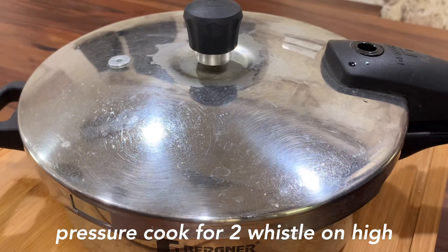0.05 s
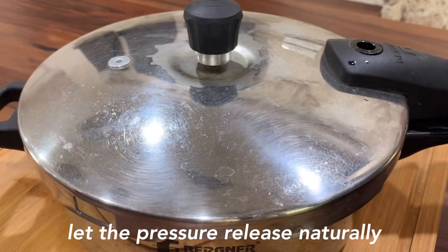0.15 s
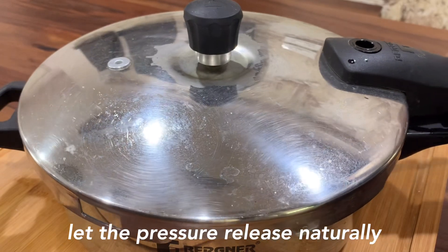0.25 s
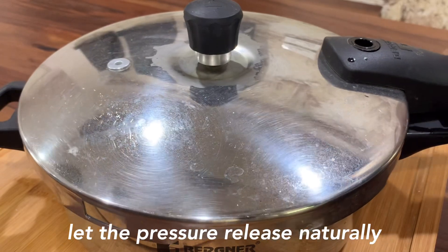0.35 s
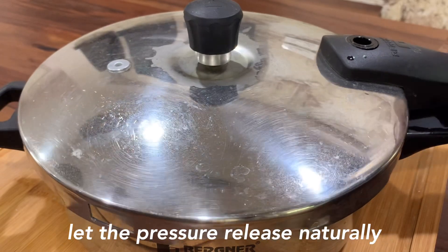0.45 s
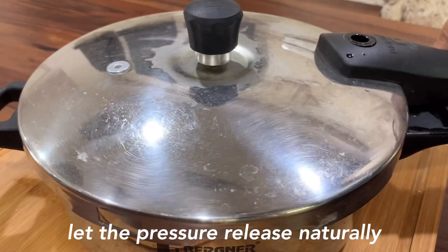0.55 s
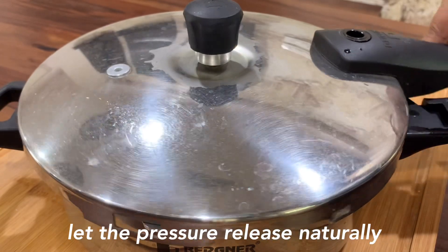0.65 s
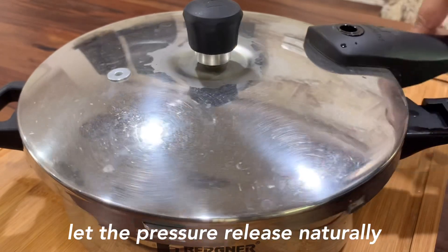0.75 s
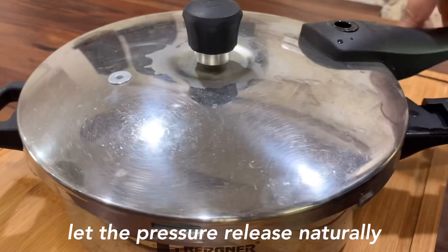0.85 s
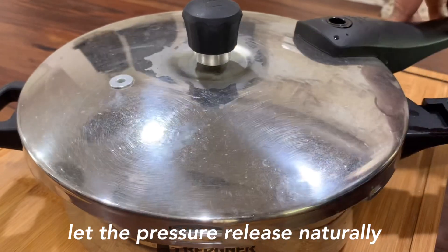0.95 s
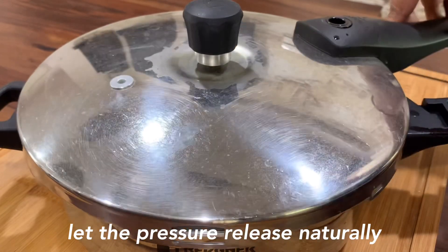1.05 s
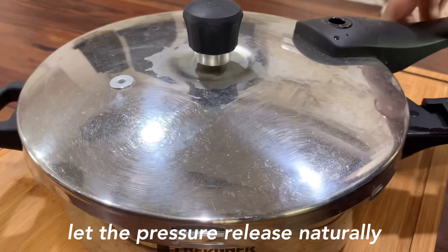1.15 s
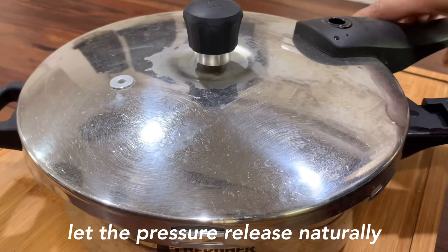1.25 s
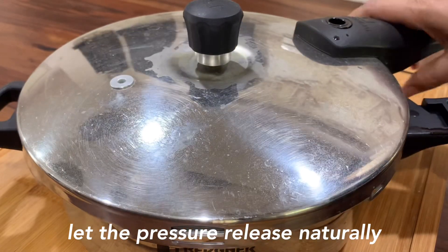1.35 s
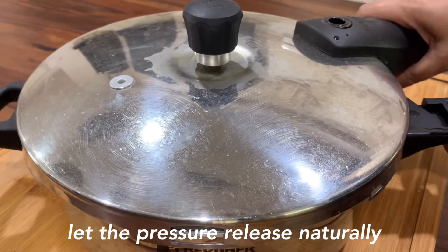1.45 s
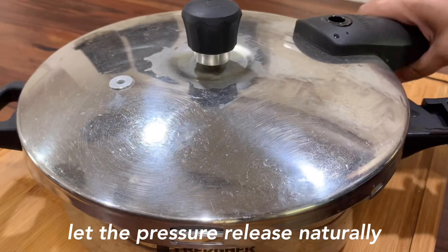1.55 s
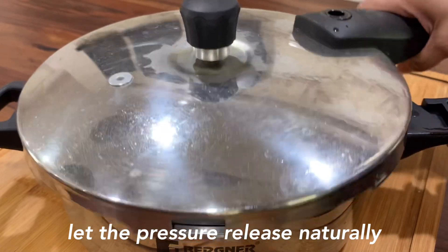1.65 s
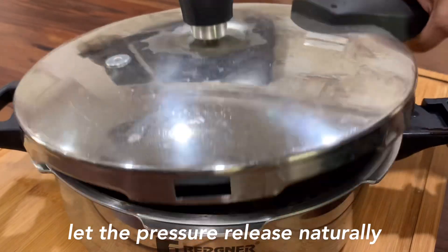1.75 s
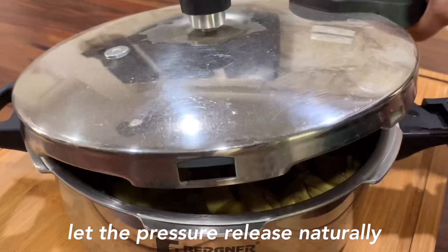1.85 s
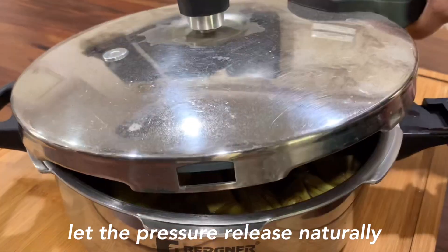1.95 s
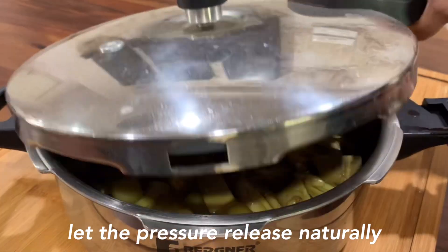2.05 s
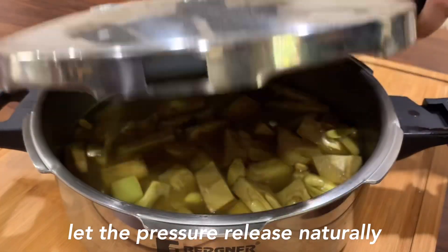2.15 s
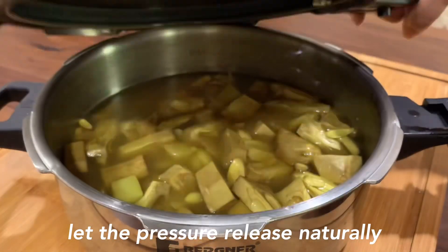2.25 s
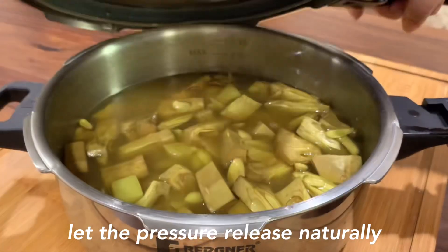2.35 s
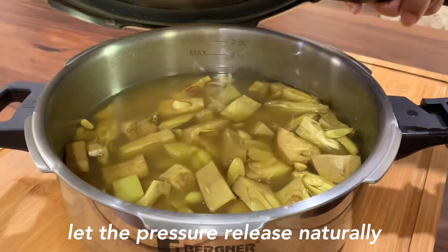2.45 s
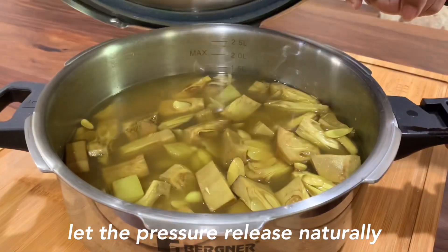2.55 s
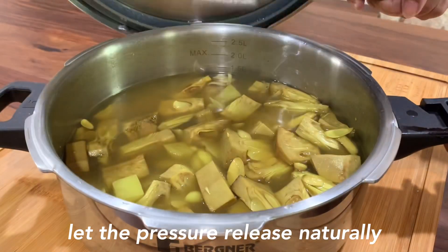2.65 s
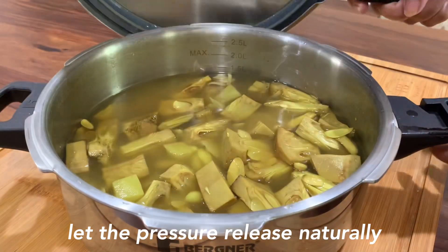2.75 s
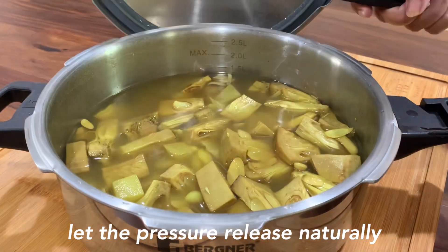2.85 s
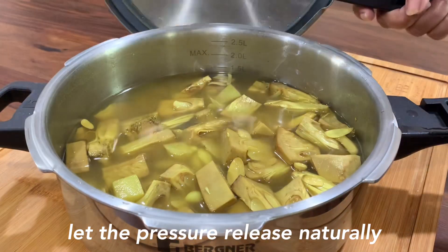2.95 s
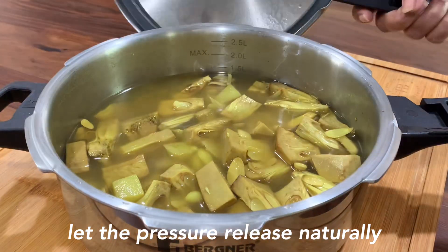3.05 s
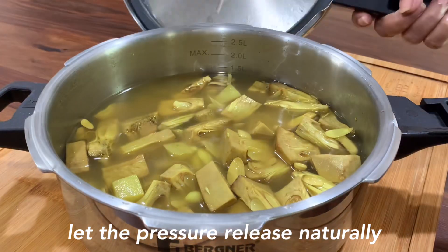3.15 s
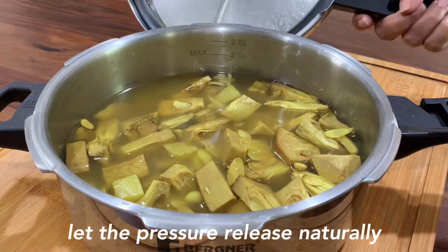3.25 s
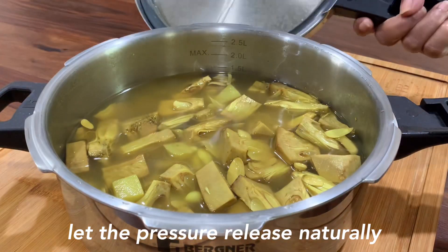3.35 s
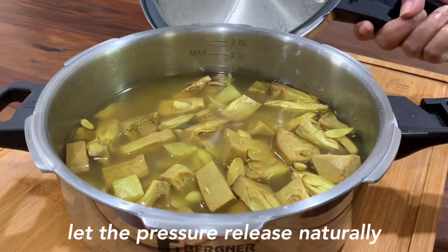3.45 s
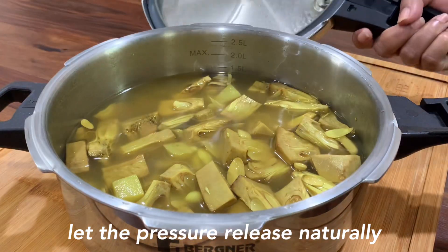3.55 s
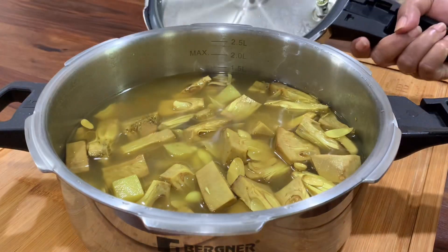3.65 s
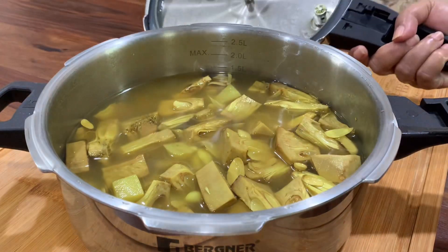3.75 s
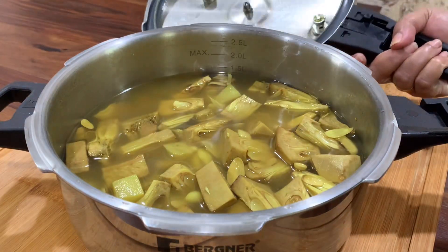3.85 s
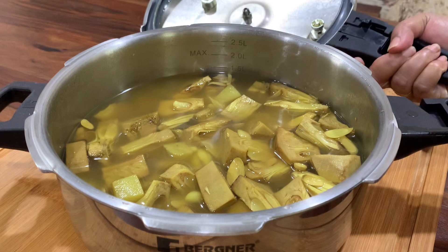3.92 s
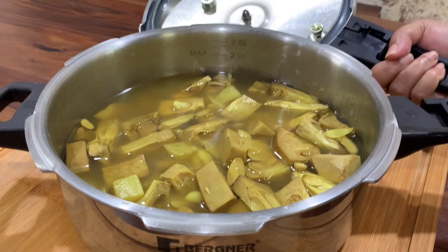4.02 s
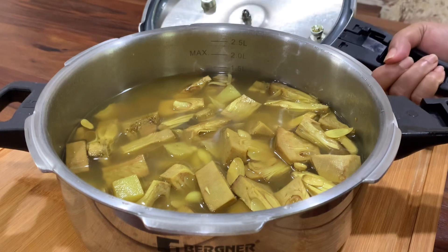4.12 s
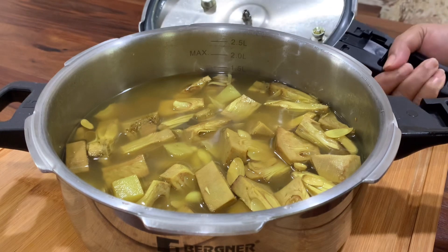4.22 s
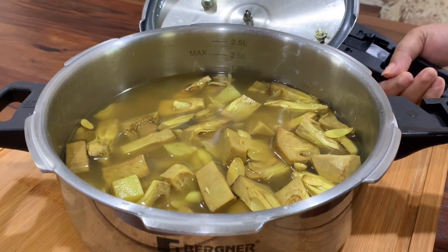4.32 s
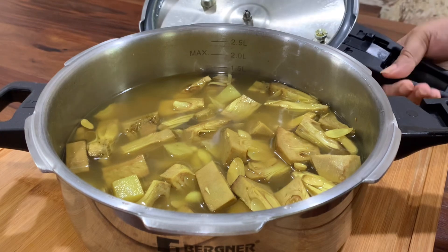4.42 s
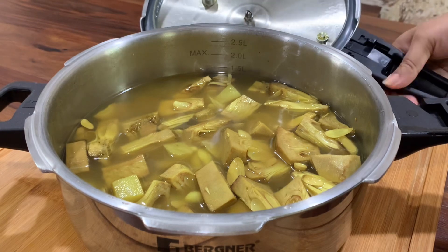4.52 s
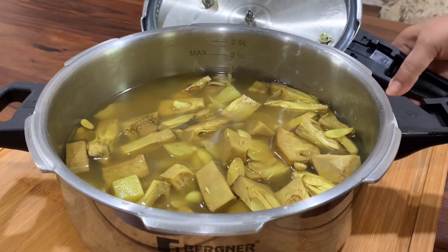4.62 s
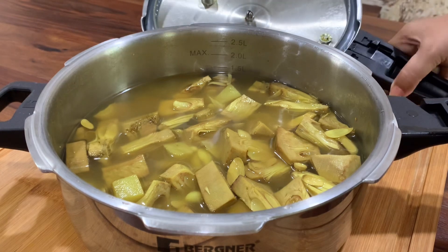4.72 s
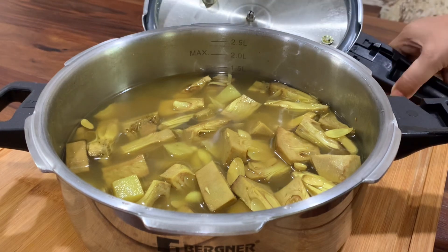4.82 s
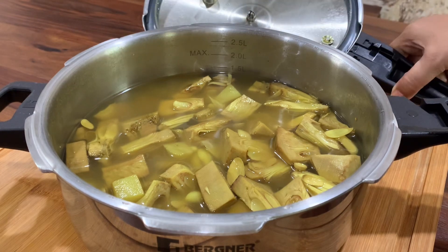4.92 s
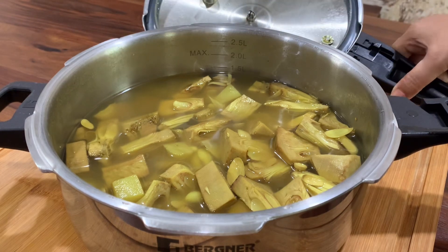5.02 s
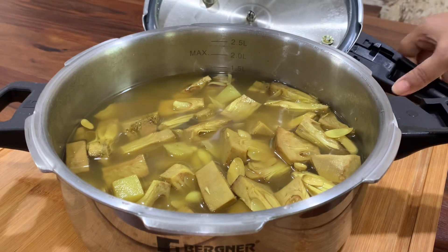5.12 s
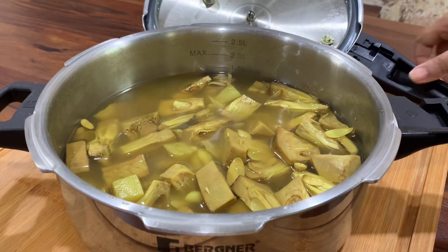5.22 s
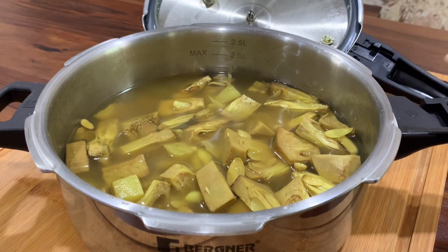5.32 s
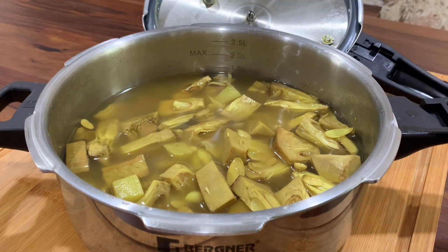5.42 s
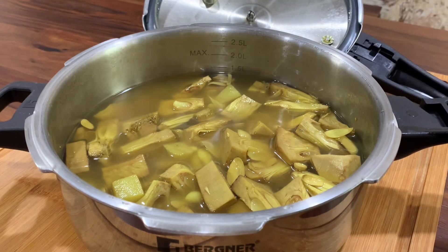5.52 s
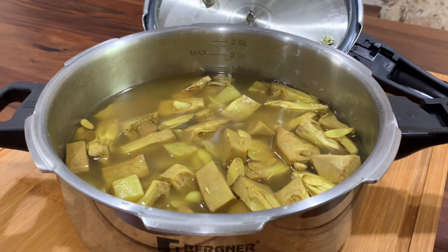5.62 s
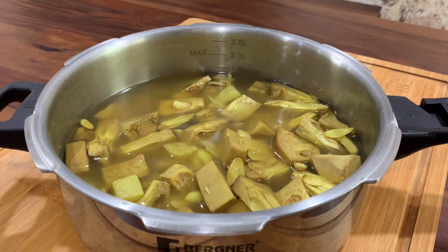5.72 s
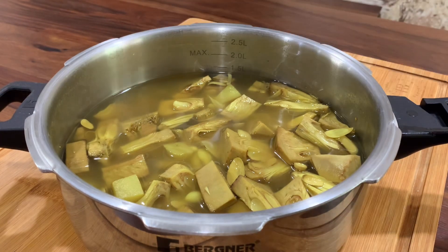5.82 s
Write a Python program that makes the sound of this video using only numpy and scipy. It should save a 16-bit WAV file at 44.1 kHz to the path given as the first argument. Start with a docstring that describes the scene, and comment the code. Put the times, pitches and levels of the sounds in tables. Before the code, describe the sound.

In a small, quiet kitchen, hands rub softly on a pressure cooker. Two sharp metal clacks unlock the lid, then a brief bright scrape and small clinks as it lifts. Its valve rattles lightly. The lid hits a wooden board in a quick loud cluster with short steel ring, and the plastic handle squeaks faintly and knocks down. Close stereo microphone, low room rumble and hiss.

```python
"""Hands shift on a steel pressure cooker in a small kitchen: swelling noise over room rumble, hiss and a thin whine.
The lid unlocks with two clacks (noise bursts and ringing modes) and scrapes off the rim (uneven slips ringing steel).
Its weight valve rasps, rolls and rattles as the lid tilts; light bumps sound short decaying notes.
The lid lands on a wooden board and settles in a swell of noise, over low swinging modes and a long sway.
The handle squeaks in fluttering partials, then drops and bounces on the board."""
import sys
import numpy as np
from scipy import signal
from scipy.fft import rfft, irfft, next_fast_len
from scipy.io import wavfile
from scipy.ndimage import uniform_filter1d, map_coordinates

SR = 44100
rng = np.random.default_rng(int(sys.argv[2]) if len(sys.argv) > 2 else 0)


def unload_wav(signal):
    """Save mono or channel-first audio to the path in sys.argv[1] as 16-bit WAV at rate SR, clipped to [-1, 1]."""
    wavfile.write(
        sys.argv[1],
        SR,
        np.round(np.clip(np.atleast_2d(signal).T, -1, 1) * 32767).astype(np.int16),
    )


N = 259043
TIME = np.arange(N) / SR
RING = np.arange(32768) / SR  # time axis of one blow [s]


def amp(db):
    """Decibels to gain."""
    return 10 ** (np.asarray(db) / 20)


def unit(x):
    """x at rms 1."""
    return x / np.sqrt(np.mean(x ** 2) + 1e-20)


def along(points, hz):
    """(Hz, value) points read on a log axis."""
    f, v = np.transpose(points)
    return np.interp(np.log(hz + 1), np.log(f + 1), v)


def wobble(rate):
    """A random curve of straight segments, rate knots a second."""
    knots = rng.standard_normal(int(N * rate / SR) + 4)
    return map_coordinates(knots, [TIME * rate], order=1)


def noise():
    """White noise for the whole scene, unrelated in the two channels."""
    return rng.standard_normal((2, N))


def add(track, s, sound):
    """Mix a sound in at time s."""
    part = track[:, max(round(s * SR), 0):][:, :sound.shape[-1]]
    part += sound[..., :part.shape[1]]


def grid(x):
    """Padded spectrum of x and its frequencies."""
    size = 2 * next_fast_len(x.shape[-1] // 2 + 2048)
    return rfft(x, size), np.fft.rfftfreq(size, 1 / SR)


def coloured(x, points):
    """Causal filter with the gain of (Hz, dB) points."""
    z, hz = grid(x)
    # folding the cepstrum forward in time gives minimum phase
    cepstrum = irfft(np.log(amp(along(points, hz))))
    cepstrum[1:len(hz) - 1] *= 2
    cepstrum[len(hz):] = 0
    return irfft(z * np.exp(rfft(cepstrum)))[..., :x.shape[-1]]


# stereo likeness: (frequency [Hz], left-right correlation)
STEREO_LIKENESS = [(150, 0.52), (400, 0.087), (1500, 0.22), (4000, 0.05), (8500, 0.94)]
# stereo balance: (frequency [Hz], left minus right [dB])
STEREO_BALANCE = [(30, 0.5), (120, -3.5), (300, -2), (1000, -0.5), (9000, -0.5)]


def ports(x, lag_ms=0.1776, beam_hz=6500):
    """Two unrelated signals become left and right: partly alike, the left a little late in the treble."""
    (a, b), hz = grid(x)
    turn = np.arccos(np.clip(along(STEREO_LIKENESS, hz), -1, 1)) / 2
    mid, side = a * np.cos(turn), b * np.sin(turn)
    balance = amp(along(STEREO_BALANCE, hz) / 2)
    lag = lag_ms / 1000 * np.minimum(hz / beam_hz, 1) ** 2
    late = np.exp(-2j * np.pi * hz * lag)
    return irfft(np.array([(mid + side) * balance * late, (mid - side) / balance]))[:, :x.shape[-1]]


# reverb decay of the kitchen: (frequency [Hz], t60 [s])
KITCHEN_DECAY = [(100, 0.58), (2500, 0.51), (6000, 0.33), (11000, 0.087), (16000, 0.13)]


def kitchen(x, wet_db, build=0.00045):
    """x plus the answer of the walls: noise whose decay time depends on pitch."""
    hz, t, z = signal.stft(rng.standard_normal((2, len(RING))), SR, nperseg=256)
    decay = amp(-60 * t / along(KITCHEN_DECAY, hz)[:, None])
    tail = signal.istft(z * decay, SR, nperseg=256)[1]
    tail = tail * (1 - np.exp(-RING / build))
    tail = tail / np.linalg.norm(tail[0])
    return x + amp(wet_db) * signal.fftconvolve(x, tail, axes=1)[:, :x.shape[1]]


def ringing(modes, t60, scatter_db=2, damping_hz=14000, blur=0.00089):
    """Slightly unsteady modes, scattered anew each blow; they die at least twice as fast as t60, high ones first."""
    hz, db = np.transpose(modes)[:, :, None]
    wander = blur * np.sqrt(hz) * np.cumsum(rng.standard_normal((len(hz), len(RING))), axis=1)
    phase = 2 * np.pi * (hz * RING + rng.random(hz.shape)) + wander
    decay_db = -60 * RING / t60 * (2.0 + (hz / damping_hz) ** 2)
    level = amp(db + scatter_db * rng.standard_normal(hz.shape) + decay_db)
    # a quarter cycle apart in the two directions
    ring = np.array([(level * np.cos(phase)).sum(0), (level * np.sin(phase)).sum(0)])
    return ring / np.linalg.norm(ring[0])


def overtones(t60, spacing_hz=110, damping_hz=7000):
    """Many lesser modes of the shell, uneven in spacing and strength; some, mostly high, die twice as fast."""
    hz = np.fft.rfftfreq(len(RING), 1 / SR)
    present = rng.random(len(hz)) < hz[1] / spacing_hz
    lines = present * (rng.standard_normal((2, len(hz))) + 1j * rng.standard_normal((2, len(hz))))
    damped = rng.random(len(hz)) < hz / (hz + damping_hz)
    decay = amp(-60 * RING / t60)
    return irfft(lines * ~damped) * decay + irfft(lines * damped) * decay ** 2


def crowd(body, modes, height_db, spread_db=0):
    """Weaker modes crowd round each main one and raise a peak on the body's colour; spread varies the heights."""
    hz = np.geomspace(30, SR / 2, 1500)
    centre = np.transpose(modes)[0][:, None]
    width = 30 + .014 * centre + (centre / 900) ** 2
    peaks = 1 / (1 + ((hz - centre) / width) ** 2)
    heights = np.maximum(height_db + spread_db * rng.standard_normal(centre.shape), 0)
    return np.c_[hz, along(body, hz) + (heights * peaks).max(0)]


# edges of the thud, knock, clack, ring and tick bands: (frequency [Hz])
BAND_EDGES = [50, 250, 1000, 3000, 8000, 16000]


def contact(attack, level_db, weight_db, hardness_db):
    """Band levels of a blow: weight lifts the two bass bands, hardness tilts everything above the clack band."""
    centres = np.sqrt(np.multiply(BAND_EDGES[1:], BAND_EDGES[:-1]))
    octaves = np.log2(centres / centres[2])
    return np.array(attack) + level_db + weight_db * (octaves < 0) + hardness_db * np.maximum(octaves, 0)


def voiced(x, levels_db, attack=0.013):
    """Filters a blow so that its attack comes close to the given level in each band."""
    edges = np.array(BAND_EDGES)
    centres = np.sqrt(edges[1:] * edges[:-1])
    for _ in range(2):  # the second pass refines the first
        z, hz = grid(x[:, :int(attack * SR)])
        power = np.histogram(hz, edges, weights=np.mean(abs(z) ** 2, 0))[0] / (len(hz) * attack * SR)
        x = coloured(x, np.c_[centres, levels_db - 10 * np.log10(power + 1e-20)])
    return x


def blows(hits, attack, body, modes, peak_db, ring_db, fine_db, ring_t60, wet_db, rise):
    """Each contact is a short burst of crowded modes that the room answers; main modes and overtones ring on."""
    out = np.zeros((2, N))
    hz, db = np.transpose(modes)
    excited = np.c_[hz, db + along(body, hz)]
    for s, level_db, weight_db, hardness_db, t60 in hits:
        shell = crowd(body, modes, peak_db, spread_db=2.5)
        burst = coloured(rng.standard_normal((2, len(RING))) * amp(-60 * RING / t60), shell)
        burst = burst / np.linalg.norm(burst[0])
        fine = coloured(overtones(ring_t60), shell)
        fine = fine / np.linalg.norm(fine[0])
        ring = amp(ring_db) * ringing(excited, ring_t60) + amp(fine_db) * fine
        blow = (kitchen(burst, wet_db) + ring) * (1 - np.exp(-RING / rise))
        add(out, s, voiced(ports(blow), contact(attack, level_db, weight_db, hardness_db)))
    return out


RELEASE_S, FADE_DB = 0.056, 29.5  # a slide fades by FADE_DB over its attack and over its release


def pressure(slides):
    """Each slide bites, holds and lets go, in straight decibel ramps."""
    total = 0
    for s, hold, attack, db in slides:
        before, after = (s - TIME) / attack, (TIME - s - hold) / RELEASE_S
        fade = np.maximum(np.maximum(before, after), 0)
        total = total + amp(db - np.minimum(FADE_DB * fade, 120))
    return total


def friction(slides, colour, wet_db, ring_t60=0.081):
    """Dense uneven slips of steel on steel ring the overtones of the part that moves, damped by the contact."""
    grip = amp(5 * wobble(900) + 1.5 * wobble(110))
    slips = noise() * grip
    rung = signal.fftconvolve(slips, overtones(ring_t60), axes=1)[:, :N]
    metal = unit(coloured(unit(rung) + 0.5 * unit(slips), colour))
    return ports(kitchen(metal * pressure(slides), wet_db))


def patchy(x, depth_db):
    """Rubbing catches unevenly: short patches of random gain across time and pitch."""
    z = signal.stft(x, nperseg=512)[2]
    field = uniform_filter1d(rng.standard_normal(z.shape[1:]), size=5, axis=0)
    field = uniform_filter1d(field, size=9, axis=1)
    return unit(signal.istft(z * amp(depth_db * unit(field)), nperseg=512)[1][:, :N])


WHINE_HZ, WHINE_DB = 2580, -87.5


def whine():
    """A faint thin tone in the room that wavers in pitch and strength."""
    return amp(WHINE_DB + 2 * wobble(10)) * np.sin(2 * np.pi * WHINE_HZ * TIME + wobble(20))


# smooth swells of rub and hiss: hands shifting on the handle,
# and at 4.117 s the lid settling and ringing on the board:
# (middle time [s], half length [s], rub level [dB], hiss level [dB])
NOISE_SWELLS = [ (0.195, 0.066, -72.5, -74.5), (0.4, 0.19, -64, -77), (0.686, 0.07, -64, -66),
                (0.95, 0.21, -64, -62), (1.286, 0.1, -71.5, -78.5), (1.733, 0.32, -65, -73.5),
                (4.117, 0.13, -67, -74.5), (4.6, 0.45, -75.5, -79), (5.818, 0.082, -70, -91.5)]
# noise colours of rumble, rubbing and hiss: (frequency [Hz], relative gain [dB])
RUMBLE_COLOUR = [(25, -20.5), (60, 5.5), (320, -5.5), (1000, -54.5)]
RUB_COLOUR = [(150, -17), (400, 0.5), (1200, -2.5), (2600, -6.5), (3100, -15), (6000, -24)]
HISS_COLOUR = [(2000, -21.5), (4000, 2.5), (8500, -5), (11500, 1.5), (15500, 0)]
RUMBLE_DB, RUB_DB, HISS_DB = -67, -77, -80.5  # the room at rest
SWELL_RUMBLE_DB = 7  # rumble that comes with a swell, over its rub


def background(tick_rate=14, tick_db=-8):
    """Room rumble, rub, hiss and sparse ticks at rest; hands and the settling lid swell them all."""
    s, half, rub_db, hiss_db = np.transpose(NOISE_SWELLS)
    swells = np.exp(-np.minimum(((TIME - s[:, None]) / half[:, None]) ** 2, 20))
    rubbing, hissing = amp(rub_db) @ swells, amp(hiss_db) @ swells

    def bed(colour):
        return unit(ports(coloured(noise(), colour)))

    rumble_level = np.hypot(amp(RUMBLE_DB), amp(SWELL_RUMBLE_DB) * rubbing)
    rumble = rumble_level * amp(2.7 * wobble(7.8)) * bed(RUMBLE_COLOUR)
    rub_level = np.hypot(amp(RUB_DB), rubbing)
    rub = rub_level * amp(1.9 * wobble(25)) * patchy(bed(RUB_COLOUR), depth_db=3.5)
    catches = (rng.random(N) < tick_rate / SR) * noise()
    ticks = unit(ports(kitchen(coloured(catches, HISS_COLOUR), wet_db=-3)))
    hiss = amp(wobble(21)) * bed(HISS_COLOUR)
    return rumble + rub + np.hypot(amp(HISS_DB), hissing) * (hiss + amp(tick_db) * ticks)


# weight coming down on the table, before the stereo balance: (time [s], level [dB])
TABLE_THUMPS = [(0.974, -32.5), (1.010, -29.5), (2.168, -42), (3.943, -24), (4.820, -38.5)]
# modes of board and table top: (frequency [Hz], level over the thump [dB], t60 [s])
TABLE_MODES = [(74.7, -4, 0.36), (128, 0.5, 0.37), (138.6, -0.5, 0.13), (166.4, -1, 0.11)]
# the whole table swaying, level over the thump
SWAY_HZ, SWAY_DB, SWAY_T60 = 39.34, -26.5, 2.9


def table(swell=0.013):
    """Board and table top swing after the heavy blows; the heaviest also sets the table swaying."""
    out = np.zeros((2, N))

    def mode(hz, db, t60):
        return amp(db - 60 * RING / t60) * np.sin(2 * np.pi * hz * RING) * (1 - np.exp(-RING / swell))

    for s, db in TABLE_THUMPS:
        add(out, s, amp(db) * sum(mode(*row) for row in TABLE_MODES))
    s, db = max(TABLE_THUMPS, key=lambda row: row[1])
    add(out, s, amp(db) * mode(SWAY_HZ, SWAY_DB, SWAY_T60))
    return out * amp([[-3], [2.5]])  # stronger on the right


# light bumps of handle, lid and valve: (time [s], level [dB], frequency [Hz])
BUMP_NOTES = [(0.367, -45, 320), (1.660, -41.5, 505), (1.680, -37, 313), (2.153, -36, 479),
              (2.156, -38.5, 388), (2.22, -42.5, 1447), (2.994, -34.5, 905), (4.814, -31.5, 287)]


def bumps(t60=0.054, rise=0.00036, wet_db=-7):
    """A light bump sounds one short note: hollow from the pot, bright from the valve."""
    out = np.zeros((2, N))
    for s, db, hz in BUMP_NOTES:
        note = np.sin(2 * np.pi * hz * RING) * (1 - np.exp(-RING / rise))
        add(out, s, amp(db - 60 * RING / t60) * note)
    return kitchen(out, wet_db)


# span of the squeak, just before the handle drops: (start [s], end [s])
SQUEAK_SPAN = (4.63, 4.785)
# its partials: (frequency [Hz], level [dB])
SQUEAK_TONES = [(885, -71.5), (1022, -69), (2060, -80), (2560, -77.5)]


def squeak(rough=0.69):
    """The handle squeaks faintly in the hand: each partial flutters in pitch and strength."""
    start, end = SQUEAK_SPAN
    swell = np.clip(np.minimum(TIME - start, end - TIME) * 20, 0, 1)
    tones = 0
    for hz, db in SQUEAK_TONES:
        tones = tones + amp(db + 2 * wobble(60)) * np.sin(2 * np.pi * hz * TIME + rough * wobble(90))
    return swell * tones


# plastic handle dropping on the board and bouncing: (time [s], level [dB], bass weight [dB],
# treble hardness [dB per octave], contact t60 [s])
HANDLE_DROPS = [ (4.8115, -34, -0.5, -5, 0.028), (4.859, -42.5, 4.5, -8.5, 0.035),
                (5.451, -63, -2, -0.5, 0.089)]
# attack of a plain contact on the board, also used by the lid: (thud, knock, clack, ring, tick [dB])
WOOD_ATTACK = (-4, 0, -1, -13.5, -18)
# colour of the crowded, quickly dying modes: (frequency [Hz], gain [dB])
HANDLE_COLOUR = [(45, -25), (115, 7.5), (460, -8.5), (740, 3), (1300, -1.5), (2100, -3.5), (3500, -8),
                 (15000, -38)]
# main modes of the handle: (frequency [Hz], level [dB])
HANDLE_MODES = [(730, -2), (1980, -1.88)]


def handle():
    """Plastic on wood: a dull burst with little ring."""
    return blows(HANDLE_DROPS, WOOD_ATTACK, HANDLE_COLOUR, HANDLE_MODES, peak_db=9.5,
                 ring_db=-22, fine_db=-5.5, ring_t60=0.19, wet_db=-8, rise=0.0011)


# valve starting to tip: (time at full level [s], hold [s], attack [s], level [dB])
VALVE_TIPS = [(2.925, 0.029, 0.023, -52.5)]
# its rasp: (frequency [Hz], gain [dB])
RASP_COLOUR = [(550, -37.5), (800, 5.5), (1080, -2), (2500, -54)]


def valve_tip():
    """The tipping valve slips with a low rasp."""
    return friction(VALVE_TIPS, RASP_COLOUR, wet_db=-2)


# main modes of the steel lid, shared by roll, rattle and lid blows: (frequency [Hz], level [dB])
STEEL_MODES = [(834, -1.5), (1225, -2), (1375, -1), (1460, 1.5), (1915, -1.5), (2340, -2), (2850, 6),
               (4290, 5.5), (6370, -1), (9040, 1.5), (10690, 2.5), (10870, -0.5), (11876, -0.5)]
# valve rolling round its pipe: (time at full level [s], hold [s], attack [s], level [dB])
VALVE_ROLLS = [(2.957, 0.028, 0.026, -33.5)]
# its colour: (frequency [Hz], gain [dB])
VALVE_ROLL_COLOUR = [(700, -25.5), (1550, 5.5), (2700, -11.5), (5000, -24.5)]


def valve_roll():
    """Steel slips round the pipe, coloured by the modes of the lid."""
    return friction(VALVE_ROLLS, crowd(VALVE_ROLL_COLOUR, STEEL_MODES, height_db=8.5), wet_db=-19)


# weight valve against its pipe: (time [s], level [dB], bass weight [dB],
# treble hardness [dB per octave], contact t60 [s])
VALVE_RATTLES = [ (2.957, -44, -3.5, -1.5, 0.038), (2.971, -44, -21, -2.5, 0.1),
                 (2.9942, -34, -11, -1.5, 0.01), (3.015, -46.5, -18, -3.5, 0.011), ]
# attack of a plain valve contact, also used by the slam: (thud, knock, clack, ring, tick [dB])
FITTING_ATTACK = (-14, -3, 1, -7.5, 2)
# colour of the crowded modes: (frequency [Hz], gain [dB])
VALVE_COLOUR = [(130, 13), (600, -9.5), (900, 0.5), (1500, -4), (2700, -2), (3700, -7), (9500, -13),
                (13000, -16), (15500, -44)]


def valve():
    """The valve rattles on its pipe: light on bass, with strong overtones."""
    return blows(VALVE_RATTLES, FITTING_ATTACK, VALVE_COLOUR, STEEL_MODES, peak_db=9.5,
                 ring_db=-11.5, fine_db=-4, ring_t60=0.27, wet_db=-10.5, rise=0.00055)


# lid against the board: (time [s], level [dB], bass weight [dB],
# treble hardness [dB per octave], contact t60 [s])
LID_LANDINGS = [ (3.7785, -29, -3.5, -1, 0.073), (3.907, -30, -3, -1.6, 0.21)]
# colour of the crowded modes: (frequency [Hz], gain [dB])
BOARD_COLOUR = [(110, 6.5), (420, -1), (1400, 2), (2200, -6), (3300, -21), (8000, -30.5), (12700, -19),
                (15000, -43)]


def board():
    """Steel on wood: heavy in the bass, the treble damped, the lid's modes ringing on."""
    return blows(LID_LANDINGS, WOOD_ATTACK, BOARD_COLOUR, STEEL_MODES, peak_db=6.5,
                 ring_db=-11.5, fine_db=-5.5, ring_t60=0.27, wet_db=-7.5, rise=0.0013)


# lid falling flat with all its fittings: (time [s], level [dB], bass weight [dB],
# treble hardness [dB per octave], contact t60 [s])
LID_SLAMS = [(3.935, -23.5, -4, -0.5, 0.027), (3.941, -30, -3.5, -0.085, 0.04)]
# colour of the crowded modes: (frequency [Hz], gain [dB])
SLAM_COLOUR = [(130, 2.5), (450, -4), (1150, -4.5), (1600, 5), (3700, -14.5), (7750, -11.5), (11000, -2),
               (13200, -6.5), (15200, -3.5)]


def slam():
    """The falling lid gives short bright bursts and the longest steel ring."""
    return blows(LID_SLAMS, FITTING_ATTACK, SLAM_COLOUR, STEEL_MODES, peak_db=9.5,
                 ring_db=-12.5, fine_db=-10.5, ring_t60=0.4, wet_db=-10.5, rise=0.0019)


# rim sliding in its lugs, grinding out of them, then brushing the pot:
# (time at full level [s], hold [s], attack [s], level [dB])
RIM_SCRAPES = [(1.59, 0.076, 0.079, -53.5), (1.706, 0.05, 0.017, -36.5), (2.045, 0.012, 0.021, -65),
               (2.81, 0.05, 0.087, -72)]
# colour of the scrape: (frequency [Hz], gain [dB])
RIM_SCRAPE_COLOUR = [(400, -0.5), (900, -3.5), (1650, 5), (3200, 3.5), (8000, 1), (10500, -5.5),
                     (15500, -7.5)]
# modes of the lugs, of which the frequencies place the peaks: (frequency [Hz], level [dB])
LUG_PEAKS = [(2050, -3), (2880, 0), (4060, -5)]


def scrape():
    """Steel slips along steel, peaked at the modes of the lugs."""
    return friction(RIM_SCRAPES, crowd(RIM_SCRAPE_COLOUR, LUG_PEAKS, height_db=6), wet_db=-12.0)


# the lid's steel rim striking: (time [s], level [dB], bass weight [dB],
# treble hardness [dB per octave], contact t60 [s])
RIM_STRIKES = [ (0.964, -33.5, -2.5, -0.5, 0.054), (1.002, -34, 5, 3, 0.043),
               (1.640, -58, 11.5, -6.5, 0.026), (1.659, -53, 4.5, -2, 0.041), (1.703, -46, -3.5, 4.5, 0.1),
               (1.749, -54, -15, 8, 0.07), (2.153, -48, -0.5, -4.5, 0.088), (2.221, -47, -23.5, -5.5, 0.11),
               (2.685, -67, -3, -0.5, 0.097), (3.258, -61.5, -9, -5.5, 0.027)]
# attack of a plain rim contact: (thud, knock, clack, ring, tick [dB])
STEEL_ATTACK = (-5, -2.6, -0.75, -1.4, -2.2)
# colour of the crowded modes: (frequency [Hz], gain [dB])
RIM_COLOUR = [(50, 0), (130, 8.5), (230, -6), (690, -1.5), (950, -5), (1550, 4), (8400, -3.5), (11000, 1.5),
              (13200, -12.5), (15000, -1)]


def rim():
    """Steel on steel: sharp full-range bursts, the lid's modes and overtones ringing under them."""
    return blows(RIM_STRIKES, STEEL_ATTACK, RIM_COLOUR, STEEL_MODES, peak_db=5,
                 ring_db=-15, fine_db=-11.5, ring_t60=0.25, wet_db=-13.5, rise=0.0005)


def scene():
    """Unlock, scrape, tilt and set down, over the room."""
    room = whine() + background()
    thumps = table() + bumps()
    plastic = squeak() + handle()
    weight_valve = valve_tip() + valve_roll() + valve()
    lid = board() + slam() + scrape() + rim()
    return room + thumps + plastic + weight_valve + lid


BASS_HZ, TOP_HZ = 29, 16050


def record(dry):
    """Rolls off the deep bass and cuts steeply above the band limit."""
    z, hz = grid(dry)
    bass_cut = 1 - 1 / (1 + (hz / BASS_HZ) ** 6)
    return irfft(z * bass_cut / (1 + (hz / TOP_HZ) ** 140))[:, :N]


dry = scene()
out = record(dry)
unload_wav(out)
```